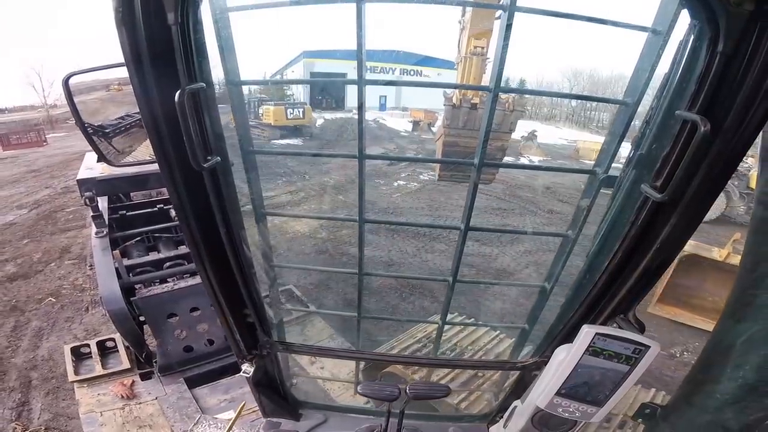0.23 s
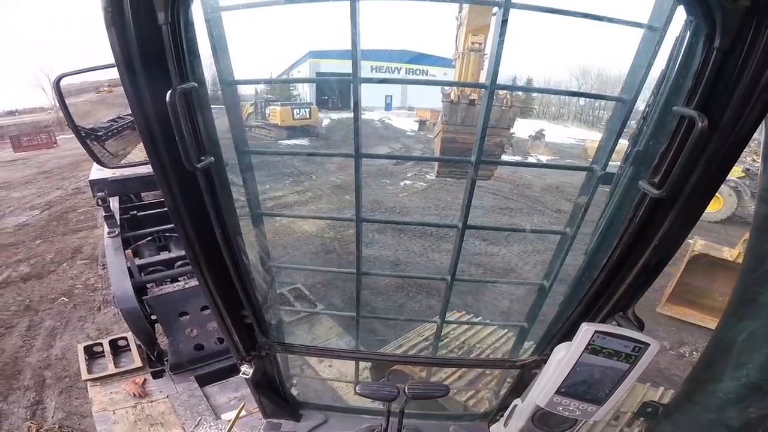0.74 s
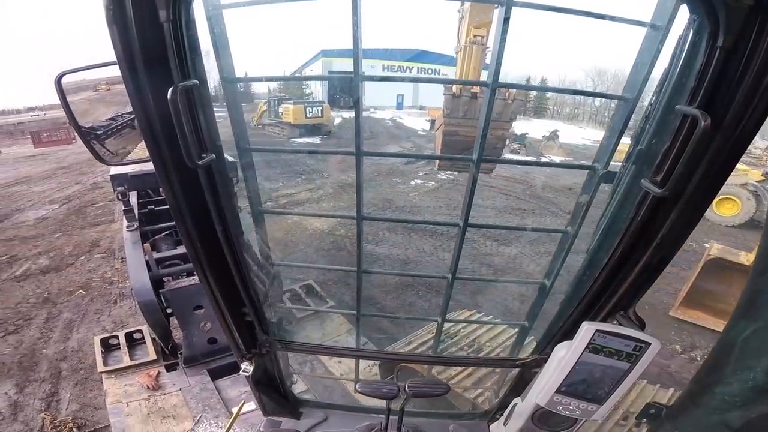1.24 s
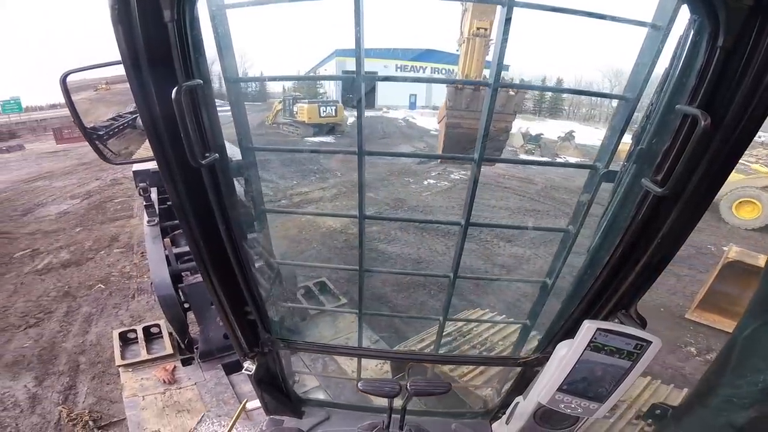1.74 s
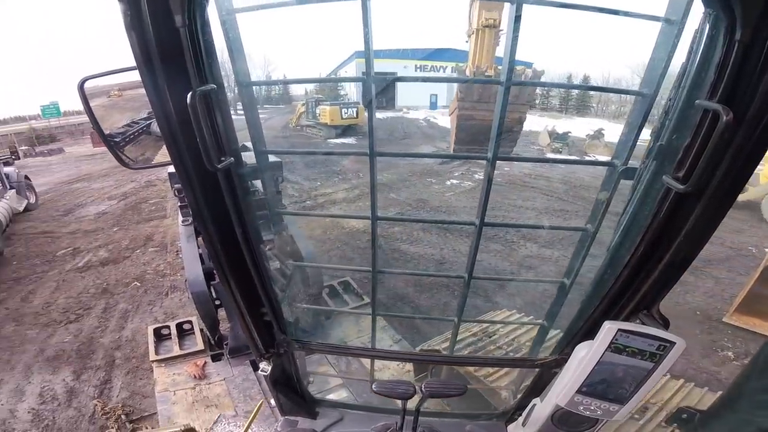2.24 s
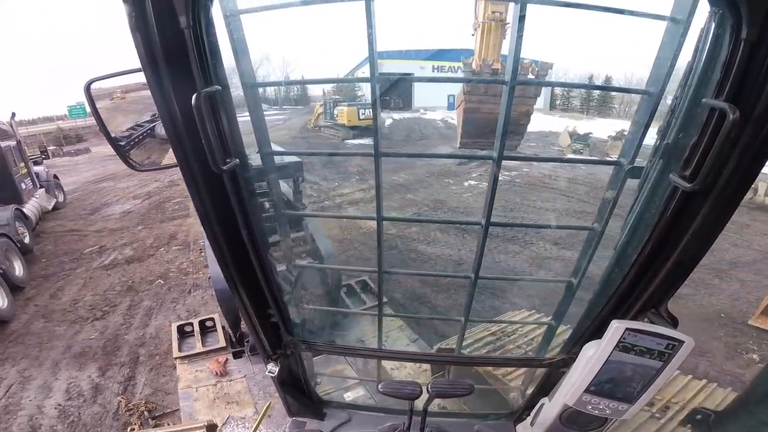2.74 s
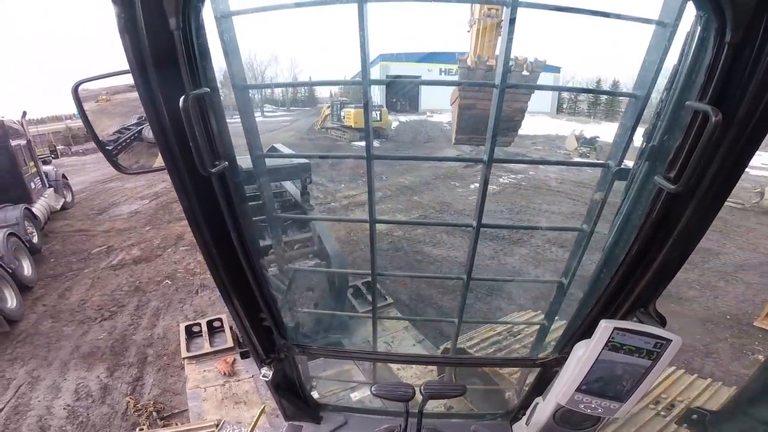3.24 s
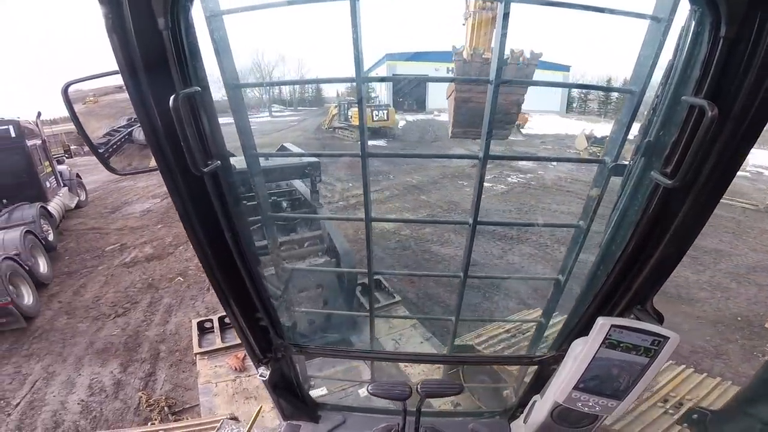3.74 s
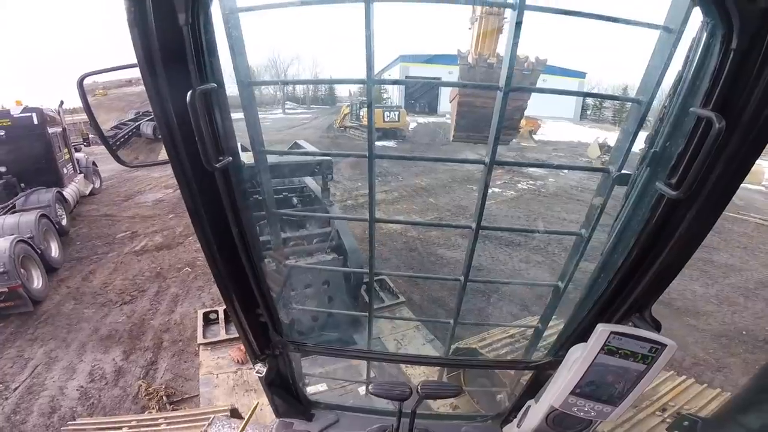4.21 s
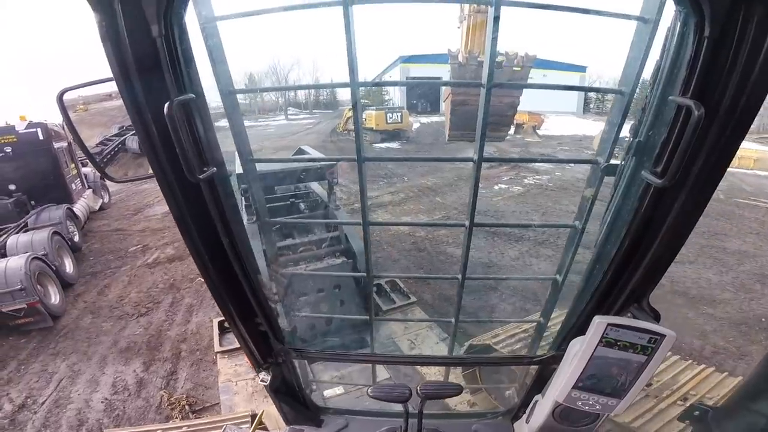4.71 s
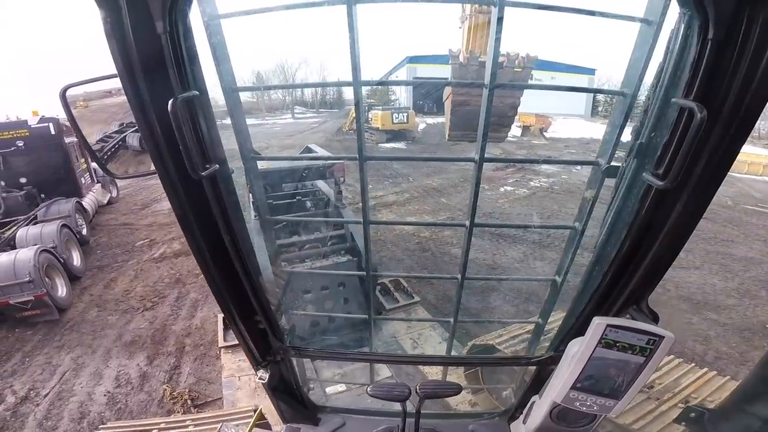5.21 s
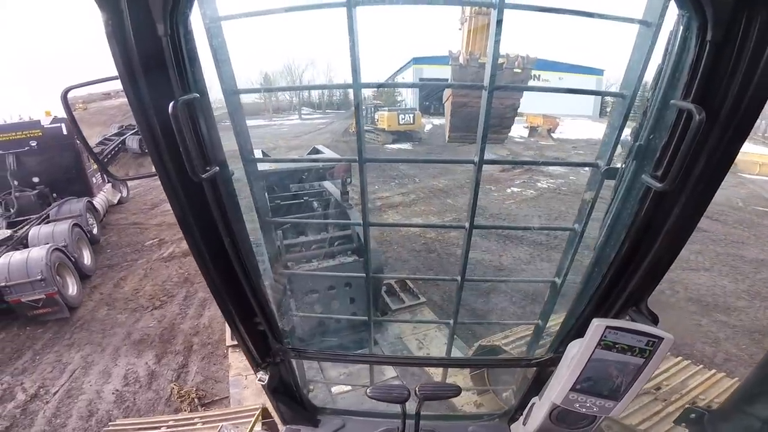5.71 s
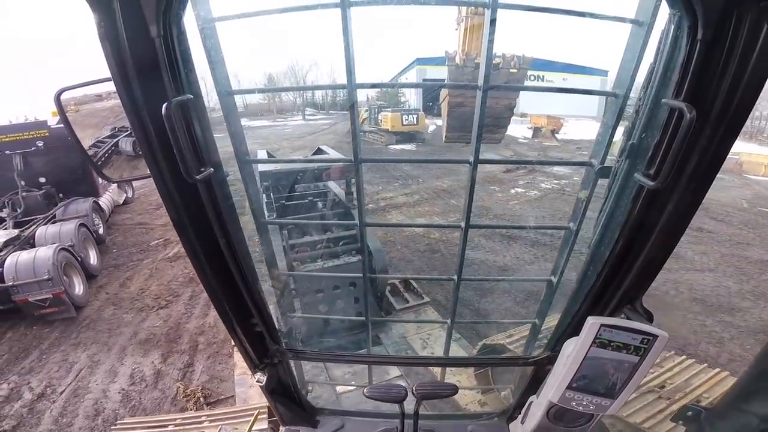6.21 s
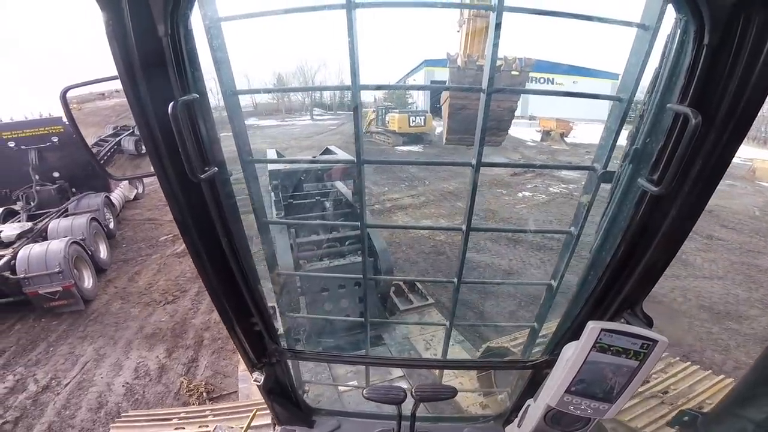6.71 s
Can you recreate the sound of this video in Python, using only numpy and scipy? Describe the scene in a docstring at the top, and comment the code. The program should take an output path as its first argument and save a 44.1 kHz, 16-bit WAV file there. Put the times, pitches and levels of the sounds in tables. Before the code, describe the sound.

Heard from an excavator's cab, a diesel engine drones deeply under shifting load as hydraulics whine and groan and fittings rattle lightly.

```python
"""A deep, wavering boom fills an excavator's cab: a six-cylinder diesel idles and sags under load.
The piston pump whines while the house swings round; the engine surges, the swing valve shuts and the
boom lifts. Firing pulses drive the cab's air and combustion clatter rings its panels. Oil hisses and
whistles through the valves, the floor rumbles and loose fittings rattle lightly."""
import sys
import numpy as np
from scipy import signal
from scipy.fft import rfft, irfft, next_fast_len
from scipy.io import wavfile
from scipy.ndimage import uniform_filter1d, map_coordinates

SR = 44100
rng = np.random.default_rng(int(sys.argv[2]) if len(sys.argv) > 2 else 0)


def generate_wav(signal):
    """Clip the signal to [-1, 1] and save it as 16-bit WAV at the path in sys.argv[1]."""
    frames = np.transpose(np.atleast_2d(signal))
    scaled = np.clip(frames, -1, 1) * 32767
    pcm = np.round(scaled).astype(np.int16)
    wavfile.write(sys.argv[1], SR, pcm)


N = 306495
CYLINDERS = 6


def amp(db):
    """Amplitude ratio of a level in decibels."""
    return 10 ** (np.asarray(db) / 20)


def unit(x):
    """Normalisation to rms 1."""
    return x / np.sqrt(np.mean(x ** 2) + 1e-20)


def gain(points, hz):
    """Gain at hz, interpolated between (frequency_hz, level_db) points on a log axis."""
    f, db = np.transpose(points)
    return amp(np.interp(np.log(hz + 1), np.log(f + 1), db))


def curve(points):
    """Linear interpolation of (time_s, value) points, one value a sample."""
    return np.interp(np.arange(N) / SR, *np.transpose(points))


def wobble(knots_per_s):
    """Slow random modulation: a spline through Gaussian knots."""
    knots = rng.standard_normal(int(N * knots_per_s / SR) + 4)
    coarse = np.arange(0, N + 64, 64)
    spline = map_coordinates(knots, [coarse * knots_per_s / SR], mode="nearest")
    return np.interp(np.arange(N), coarse, spline)


def swells(events, attack_s, release_s, rest_db, sag_db_per_s=0):
    """Power summation: level in dB of (start_s, length_s, level_db) events over a resting level."""
    t = np.arange(N) / SR
    power = amp(rest_db) ** 2 + np.zeros(N)
    for start_s, length_s, db in events:
        age = t - start_s
        shape = np.clip(np.minimum(age / attack_s, 1 - (age - length_s) / release_s), 0, 1)
        power += (amp(db - sag_db_per_s * age) * shape) ** 2
    return 10 * np.log10(power)


def filtered(x, response):
    """Linear filtering: the spectrum of x times a frequency response."""
    size = next_fast_len(N + 8192)
    return irfft(rfft(x, size) * response(np.fft.rfftfreq(size, 1 / SR)), size)[:N]


def rush(spectrum, drive=1):
    """Noise, amplitude-modulated by drive and coloured by spectrum, at rms 1."""
    return unit(filtered(drive * rng.standard_normal(N), lambda hz: gain(spectrum, hz)))


def tone(turns):
    """A sinusoid of rms 1 with a random starting phase."""
    return np.sqrt(2) * np.sin(2 * np.pi * (turns + rng.random()))


def repeating(cycles, spectrum, size=4096):
    """Periodic vibration: one waveform in every four-stroke cycle gives a dense comb of harmonics."""
    hz = np.arange(size // 2 + 1) * cycles[-1] * SR / N
    shape = irfft(gain(spectrum, hz) * np.exp(2j * np.pi * rng.random(len(hz))))
    return unit(np.interp(cycles % 1, np.arange(size) / size, shape))


def blend(a, b, share):
    """Equal-power mix of uncorrelated signals, with the given share of b."""
    return np.sqrt(1 - share) * a + np.sqrt(share) * b


def resonance(centre_hz, width_hz, drive=1):
    """Forced response of a steep-sided resonance to noise modulated by drive, at rms 1."""
    force = drive * rng.standard_normal(N)
    return unit(filtered(force, lambda hz: 1 / (1 + 1.3j * (hz - centre_hz) / width_hz) ** 2))


def patchy(x, depth_db=1.0, bins=4, frames=16):
    """Turbulent fluctuation: patches of random gain, hundreds of Hz wide and tens of ms long."""
    spectra = signal.stft(x, nperseg=256)[2]
    field = uniform_filter1d(rng.standard_normal(spectra.shape), bins, axis=0)
    field = uniform_filter1d(field, frames, axis=1)
    return signal.istft(spectra * amp(depth_db * unit(field)), nperseg=256)[1][:N]


def rattles(rise_s=0.005, t60_s=0.14, faint_count=12):
    """Damped vibration: loose fittings buzz against the frame and decay exponentially."""
    # distinct rattles: start_s, relative_db
    distinct = [(1.4094, -35.5), (2.319, -28), (2.9322, -33), (3.3662, -27), (3.7559, -24.5), (4.0103, -36),
                (6.4433, -25.5), (6.5794, -29), (6.7194, -32)]
    # spectrum of the fittings: frequency_hz, relative_db
    spectrum = [(300, -25), (1100, 12.5), (2700, -3.5), (4200, 1.5), (5400, -11), (6000, -20), (7200, -9),
                (9000, -15), (11000, -37), (15000, -39.5)]
    faint = [(rng.uniform(0, N / SR), -39 + rng.uniform(-2, 2)) for _ in range(faint_count)]
    shake = np.zeros(N)
    for start_s, db in list(distinct) + faint:
        age = np.maximum(np.arange(N) / SR - start_s, 0)
        shake += amp(db - 60 * age / t60_s) * (1 - np.exp(-age / rise_s))
    return amp(-5.5) * shake * rush(spectrum)


def whistle(centre_hz, width_hz):
    """Flow excites a narrow valve resonance in breathy spurts."""
    return amp(1.9 * wobble(30)) * resonance(centre_hz, width_hz)


def oil(firings, cycles, swing):
    """Turbulent flow: oil hisses through the open valve, which whistles louder as it throttles."""
    # hiss of the lift and swing valves: frequency_hz, relative_db
    lift_spectrum = [(2000, -9), (3800, -5), (4450, -11), (5100, 2), (5500, -4.5), (5950, -15),
                     (6600, -8.5), (7600, -15), (8800, -16), (10000, -25), (11500, -29.5), (15000, -33.5)]
    swing_spectrum = [(2000, -11.5), (3500, -10), (4700, 1), (5300, 2), (5600, -4), (5950, -16),
                      (6400, -8.5), (7400, -7), (8000, -10.5), (8900, -9), (9900, -19.5), (11000, -22),
                      (15000, -32.5)]
    # throttling: start_s, length_s, relative_db
    throttles = [(2.05, .3, -51.5), (3.2, .24, -49.5), (5.85, 0.5, -54.5), (6.3, .6, -52)]
    sputter = amp(0.36 * wobble(40) + 0.4 * tone(firings) + 0.31 * tone(cycles))
    flow = patchy(blend(rush(lift_spectrum), rush(swing_spectrum), share=swing))
    hiss = amp(-49.5 - 2 * swing + 1.34) * flow
    lift_valve = whistle(centre_hz=4230, width_hz=300)
    lift_valve += amp(-12) * whistle(centre_hz=6800, width_hz=220)
    swing_valve = whistle(centre_hz=4334, width_hz=140)
    whistle_db = swells(throttles, attack_s=0.24, release_s=0.22, rest_db=-64.5 + 10 * swing) - 1.5
    return sputter * (hiss + amp(whistle_db) * (swing * swing_valve + (1 - swing) * lift_valve))


def floor_shaking(load):
    """Relative floor vibration in dB: it rises off load and as the swing starts and brakes."""
    # shudders: start_s, length_s, relative_db
    shudders = [(1.52, .25, -27.5), (3.17, .4, -25.5), (3.5, 0.2, -20)]
    return swells(shudders, attack_s=0.11, release_s=0.073, rest_db=-30.5 + 3.5 * (1 - load))


def floor_rumble(shaking_db):
    """Structure-borne sound: the shaking floor radiates low noise."""
    # spectrum of the floor: frequency_hz, relative_db
    spectrum = [(12, -3.5), (28, 1.5), (50, 3), (72, 6), (105, 3), (160, -0.5), (185, -1.5), (215, -21),
                (400, -55.5), (900, -120)]
    return amp(shaking_db - 4) * rush(spectrum)


def combustion_knock(firings, decay_firings=0.4):
    """Impulsive excitation: a decaying pulse at each firing, each cylinder at its own strength."""
    strength = amp(1.7 * unit(rng.standard_normal(CYLINDERS)))
    cylinder = firings.astype(int) % CYLINDERS
    return 1 + 0.5 * strength[cylinder] * np.exp(-(firings % 1) / decay_firings)


def bay_roar(cycles, knock, swing, groan_db):
    """Random and periodic vibration add in power in the engine bay; the roar grows with the groan."""
    # spectrum of the bay: frequency_hz, relative_db
    spectrum = [(100, -62.5), (170, -16), (220, -4.5), (270, -2), (345, -7), (410, 4.5), (540, 1),
                (605, -3), (680, -2), (750, -5), (810, -2.5), (890, -8), (1100, -20), (3000, -120)]
    level = amp(1.15) * np.hypot(amp(-38 + 2 * swing), amp(groan_db - 6.5))
    return level * blend(rush(spectrum, knock), repeating(cycles, spectrum), share=0.44)


def panels(knock, swing):
    """Modal resonance: knock keeps the cab's panels and glass ringing, each mode wavering on its own."""
    # modes: frequency_hz, width_hz, lift_relative_db, swing_relative_db
    modes = [(530.5, 19, -11.5, -16), (688, 22.6, -7, -11), (992, 70, -11.5, -15), (1081, 58, -18, -14.5),
             (1159, 71, -10.5, -21), (1471, 72, -9.5, -12.5), (1674, 70, -12, -24.5),
             (1967, 70, -18, -21.5), (2223, 63, -24, -20), (2560, 54, -21, -20.5), (2807, 120, -16.5, -30),
             (3426, 46, -22.5, -33), (4060, 120, -25.5, -37)]
    ring = np.zeros(N)
    for hz, width_hz, lift_db, swing_db in modes:
        level_db = lift_db + swing * (swing_db - lift_db) + 1.5 * wobble(8)
        ring += amp(level_db) * resonance(hz, width_hz, knock)
    return ring


def clatter(cycles, knock, swing):
    """Abrupt combustion excites a broad band: ticking at each firing, and the ring of the panels."""
    # strength of the clatter: time_s, relative_db
    levels = [(0.0, -34.5), (0.6, -35.87), (1.16, -38.65), (1.95, -36), (3.8, -36.5), (4.15, -37.5),
              (5.89, -36.5), (6.05, -36), (6.95, -34.6)]
    # spectrum of the ticking: frequency_hz, relative_db
    spectrum = [(300, -70.5), (700, -25.5), (880, -8), (980, 3), (1120, 0.5), (1280, -3), (1480, -4),
                (1750, -6.5), (2100, -10.5), (2750, -11), (3300, -15.5), (4000, -20.5), (4500, -29.5),
                (8000, -91)]
    ticking = patchy(blend(rush(spectrum, knock), repeating(cycles, spectrum), share=0.33))
    return amp(curve(levels)) * (amp(-1.5) * ticking + panels(knock, swing))


def engine_hum(cycles, swing, shaking_db, jitter_cycles=0.0012):
    """Unequal cylinders give harmonics of the cycle rate; the low ones growl when the floor shakes."""
    # engine orders: cycle_multiple (rounded below), lift_relative_db, swing_relative_db
    orders = [(3, -46.5, -49.5), (9, -40.5, -38.5), (10, -36.5, -46.5), (11, -40.5, -52), (12, -33.5, -33),
              (14, -38, -36), (16, -49.5, -46.5), (18, -37, -38.5), (20, -47.5, -44), (21, -42, -35.5),
              (22, -37.5, -49.5), (24, -52, -41.5), (26, -51, -43), (30, -68.5, -44.5), (32, -50, -43.5),
              (44, -59, -46.5), (48, -51.5, -49), (60, -61.5, -52), (71.97, -46.5, -49.5),
              (74.1, -50, -55.5), (83.76, -54, -47.5), (107.6, -48, -56), (140.9, -55.5, -49.5)]
    growl_db = 0.65 * (shaking_db + 28)
    hum = np.zeros(N)
    for order, lift_db, swing_db in orders:
        level_db = lift_db + swing * (swing_db - lift_db) - 0.5 + 1.7 * wobble(4)
        if order < 23:
            level_db += growl_db
        # timing scatter leaves the low lines clean and smears the high ones
        hum += amp(level_db) * tone(round(order) * (cycles + jitter_cycles * wobble(12)))
    return hum


def groan_levels():
    """Envelopes in dB of the firing harmonics that swell under strain, keyed by harmonic number."""
    # groans: start_s, length_s, tenth_db, thirteenth_db, seventh_db
    groans = [(0.448, 0.2, -30, -43, -54), (.72, .6, -35.5, -38, -44.5), (1.65, .75, -44, -60, -47.5),
              (2.45, .8, -37.5, -55, -52), (5.93, .3, -39, -49, -52), (6.22, 0.19, -41, -52, -37.5)]
    # between groans: tenth_db, thirteenth_db, seventh_db
    resting = (-49.5, -59.5, -50)
    levels = {}
    for column, harmonic in enumerate((10, 13, 7)):
        events = [(start_s, length_s, dbs[column]) for start_s, length_s, *dbs in groans]
        levels[harmonic] = swells(events, attack_s=0.14, release_s=0.36, rest_db=resting[column])
    return levels


def drive_groan(firings, groan_db):
    """Forced vibration: the strained drive rasps at multiples of the firing rate."""
    # partners of the 13th harmonic: firing_multiple, relative_db
    rasp = [(3, 3), (8, -9), (11, -17), (12, -12.5), (12.5, -10), (17, -16.5)]
    lines = list(groan_db.items()) + [(multiple, groan_db[13] + db) for multiple, db in rasp]
    return sum(amp(db + 0.98 * wobble(14)) * tone(multiple * firings + 0.03 * wobble(12))
               for multiple, db in lines)


def pump(firings, attack_s=0.11):
    """Pressure ripple: nine pistons beat three times a firing; harmonic 2 moans, harmonic 3 whines."""
    # delivery on each lever movement: start_s, length_s, whine_db, moan_db
    deliveries = [(-.15, 0.65, -33.5, -43.5), (0.526, 0.64, -35, -55), (1.645, 1.757, -27, -42.5),
                  (3.672, 0.13, -25.5, -44), (3.85, 0.51, -41.5, -50), (4.853, 0.98, -47, -42),
                  (6.04, .3, -37.5, -38), (6.497, .5, -39, -44)]
    # moan against back pressure as a movement brakes: start_s, length_s, level_db
    brakings = [(1.28, 0.33, -41), (3.22, 0.35, -38), (3.67, 0.22, -35.5)]
    whines = [(start_s, length_s, db) for start_s, length_s, db, _ in deliveries]
    moans = [(start_s, length_s, db) for start_s, length_s, _, db in deliveries]
    # pressure eases once the load is moving
    whine_db = swells(whines, attack_s, release_s=0.13, rest_db=-46.5, sag_db_per_s=1.6)
    moan_db = swells(moans, attack_s, release_s=0.13, rest_db=-52.5, sag_db_per_s=1.6)
    moan_db = swells(brakings, attack_s, release_s=0.27, rest_db=moan_db)
    strokes = 3 * firings
    moan = tone(2 * strokes + 0.054 * wobble(30))
    whine = tone(3 * strokes + wobble(20) / 80)
    return amp(whine_db + 1.1 * wobble(21)) * whine + amp(moan_db + 2.4 * wobble(25)) * moan


def cab_boom(firings, load, free_db=-26, load_rise_db=15.5, waver_db=3):
    """Firing pulses force the enclosed air in a near-pure tone: strong under load, wavering without."""
    # swells of the cab's deep boom: start_s, length_s, release_s, level_db
    boom_swells = [(.2, 1, 0.44, -19), (1.25, 0.34, 0.25, -13.5), (1.88, 0.56, .45, -18.5),
                   (3.711, 0.17, 0.3, -12), (4.107, 0.12, .18, -14)]
    boom_db = free_db + load_rise_db * load + waver_db * (1 - load) * wobble(16)
    for start_s, length_s, release_s, db in boom_swells:
        boom_db = swells([(start_s, length_s, db)], attack_s=0.049, release_s=release_s, rest_db=boom_db)
    return amp(boom_db + 0.15 * wobble(24)) * tone(firings)


def engine_load(firing_hz, free_hz=45.68, full_sag_hz=1.63, lag_s=0.055):
    """Speed droop: load, 0 to 1, follows the sag below the free-running firing rate a moment later."""
    t = np.arange(N) / SR
    sag = np.clip((free_hz - firing_hz) / full_sag_hz, 0, 1)
    return np.interp(t - lag_s, t, sag)


def scene():
    """Superposition: all that turns is locked to the crankshaft; load and swing valve shape the levels."""
    # engine speed: time_s, firing_hz
    speed = [(0.0, 45.54), (0.25, 45.73), (0.7, 44.02), (1.21, 43.72), (1.71, 45.47), (2.0, 46.19),
             (2.56, 45.9), (3.56, 45.15), (3.77, 48.29), (3.89, 48.67), (4.2, 46.51), (4.42, 44.06),
             (4.6, 43.29), (5.69, 44.97), (6.24, 43.29), (6.95, 45.62)]
    # swing valve: time_s, open_fraction
    swing_opening = [(0, 0.96), (1.2, 0.44), (1.9, 1), (3.6, 0.9), (3.8, 0.3), (4.5, 0), (5.9, 0.07),
                     (6.9, 0.65)]
    firing_hz, swing = curve(speed), curve(swing_opening)
    firings = np.cumsum(firing_hz) / SR
    cycles = firings / CYLINDERS
    load = engine_load(firing_hz)
    groan_db = groan_levels()
    shaking_db = floor_shaking(load)
    engine = cab_boom(firings, load) + engine_hum(cycles, swing, shaking_db)
    knock = combustion_knock(firings)
    engine += floor_rumble(shaking_db) + bay_roar(cycles, knock, swing, groan_db[10])
    engine += clatter(cycles, knock, swing)
    hydraulics = pump(firings) + drive_groan(firings, groan_db) + oil(firings, cycles, swing)
    return (engine + hydraulics + rattles())[None]


def record(dry, top_hz=15300):
    """Band limiting: an ideal low-pass removes the highest treble."""
    return np.array([filtered(x, lambda hz: hz < top_hz) for x in dry])


dry = scene()
out = record(dry)
generate_wav(out)
```